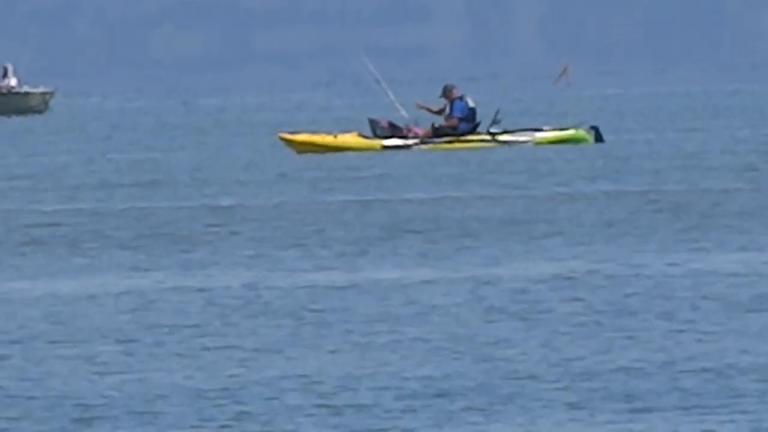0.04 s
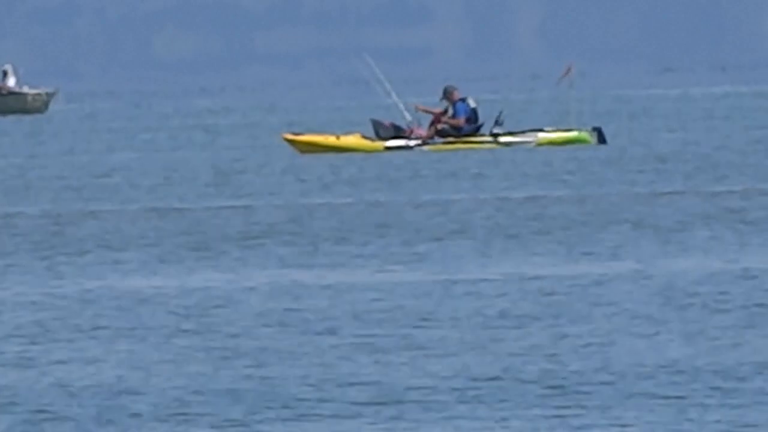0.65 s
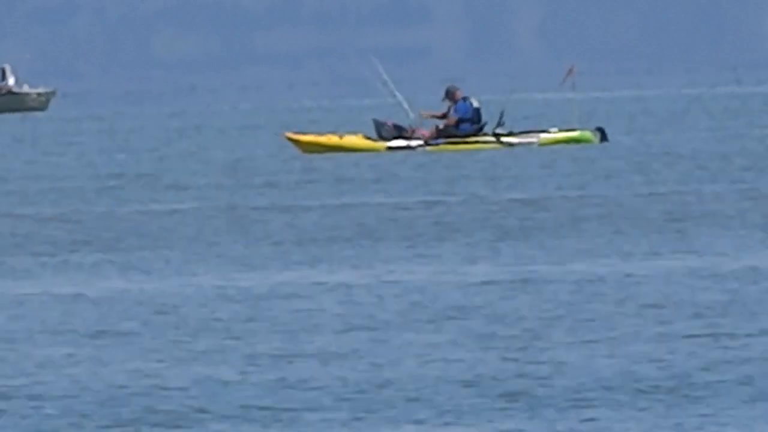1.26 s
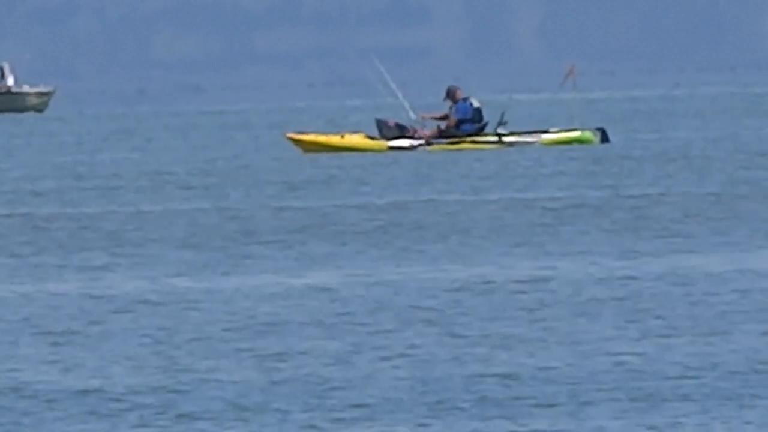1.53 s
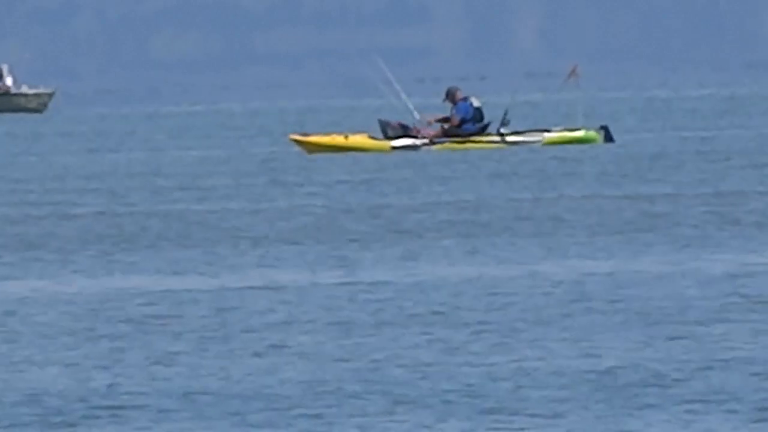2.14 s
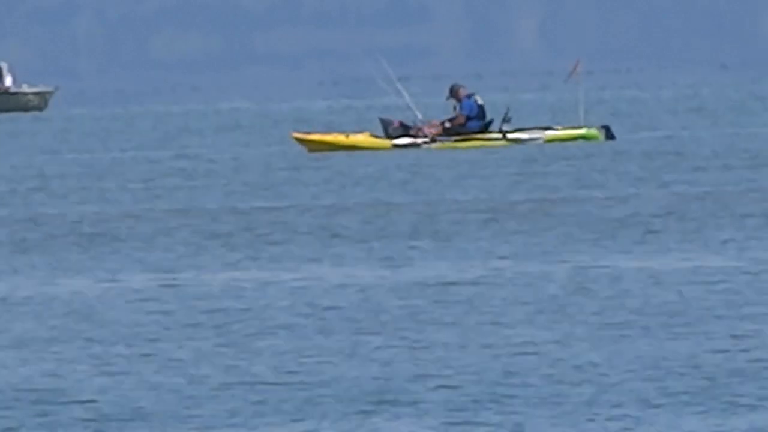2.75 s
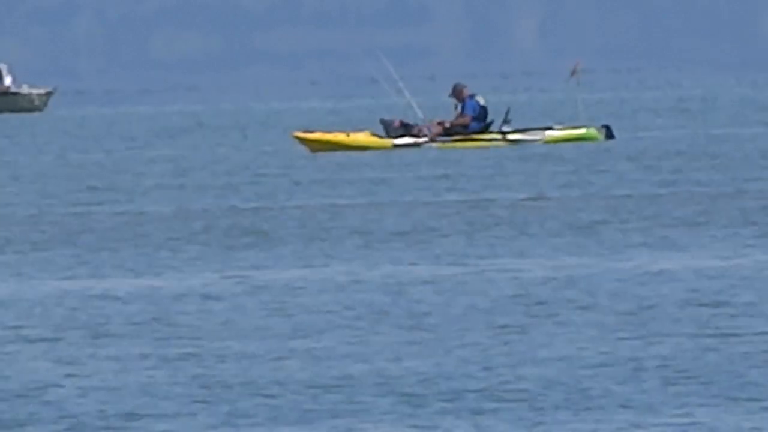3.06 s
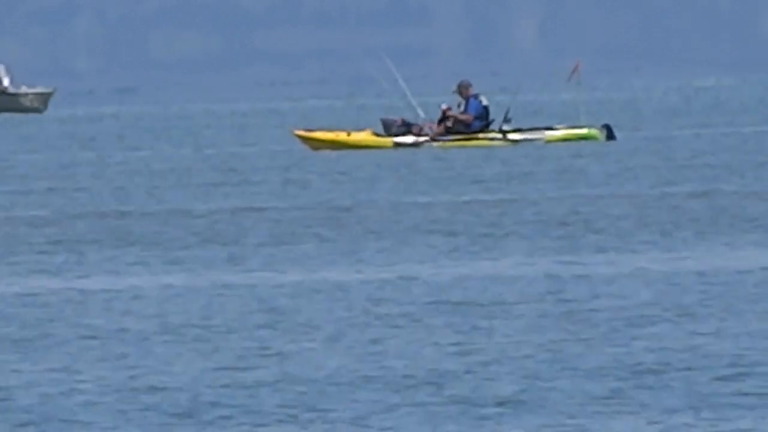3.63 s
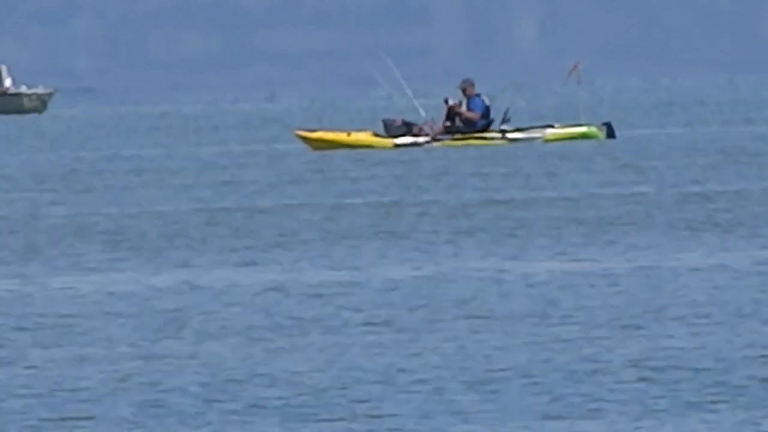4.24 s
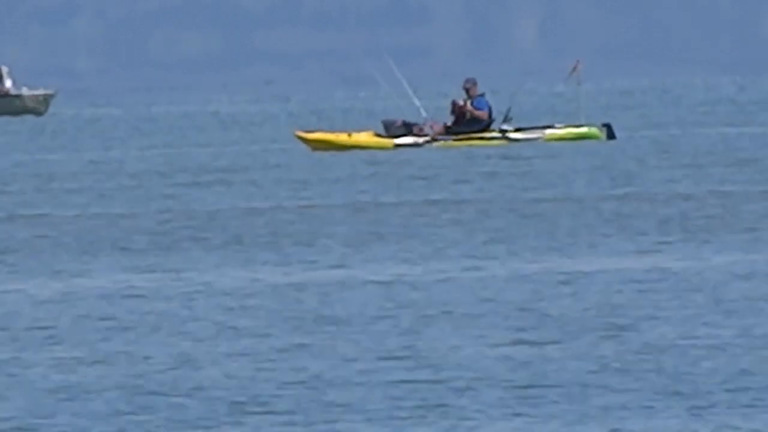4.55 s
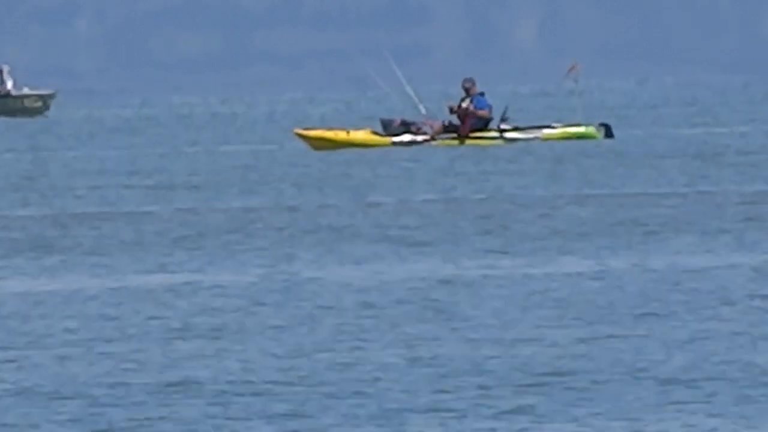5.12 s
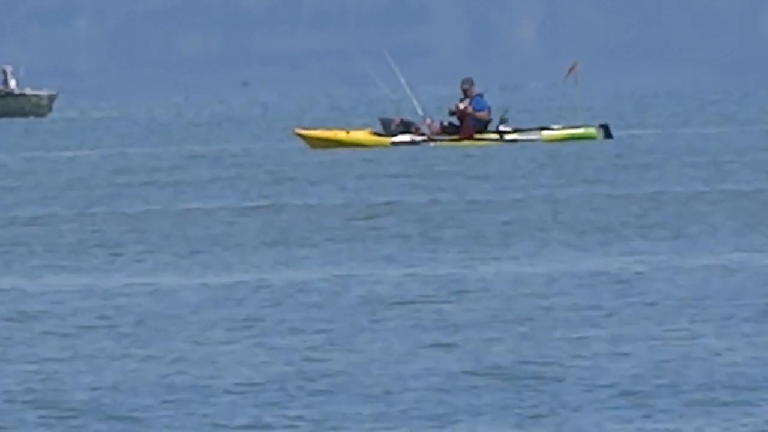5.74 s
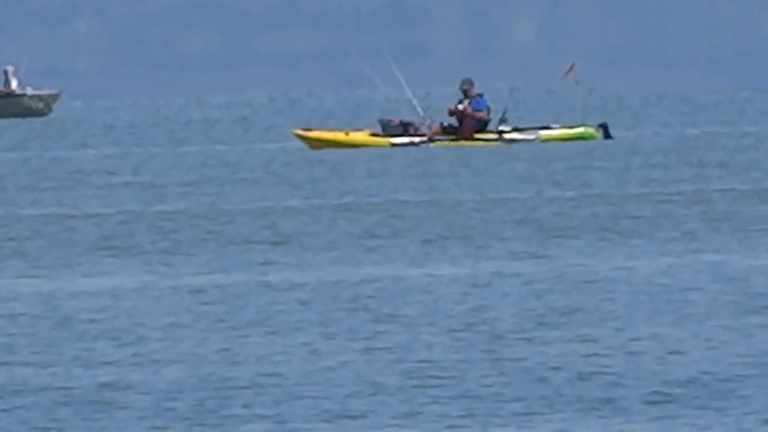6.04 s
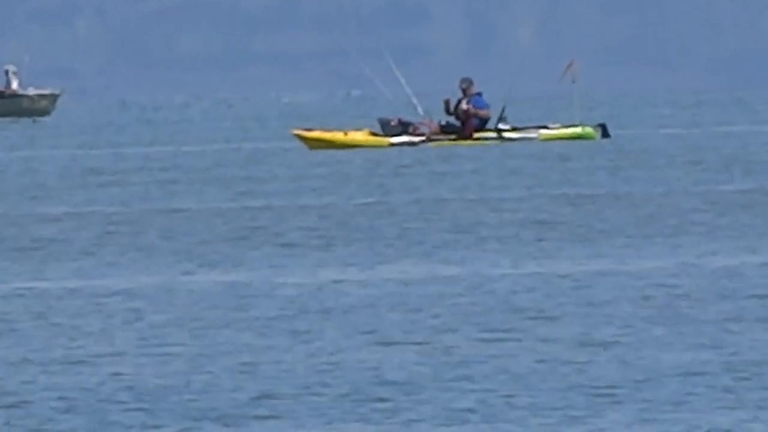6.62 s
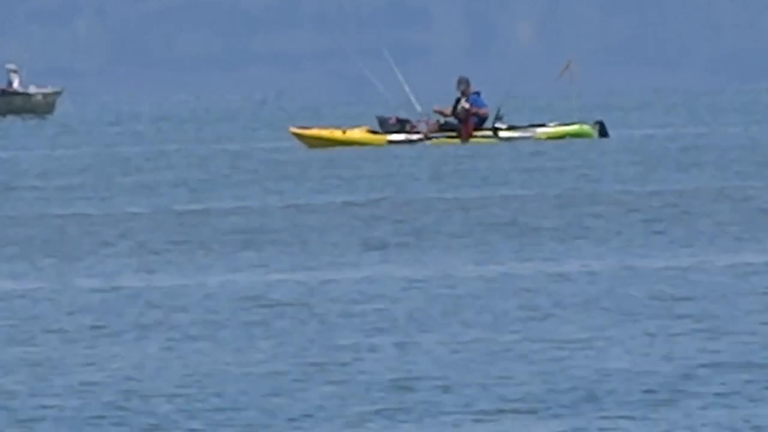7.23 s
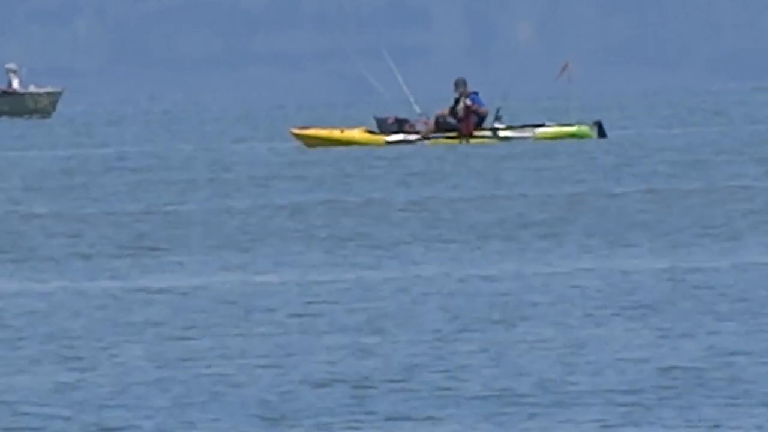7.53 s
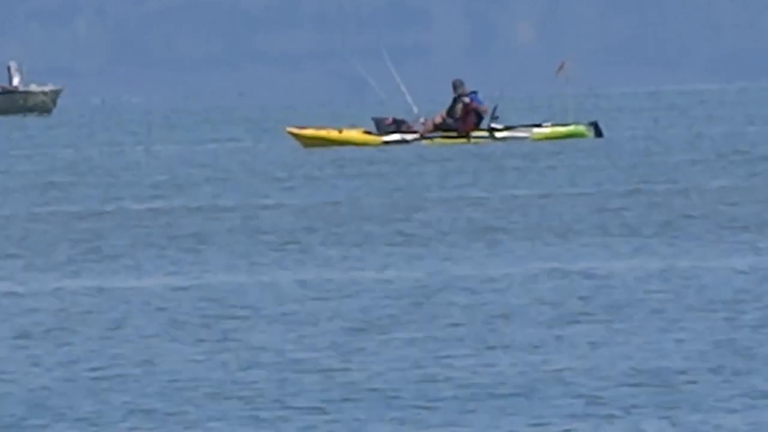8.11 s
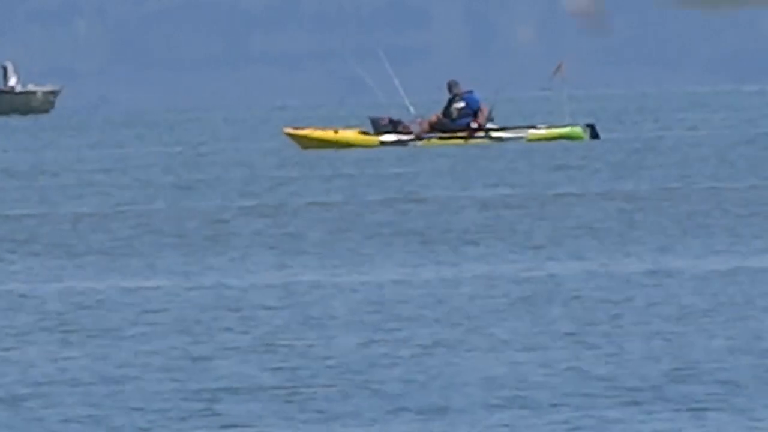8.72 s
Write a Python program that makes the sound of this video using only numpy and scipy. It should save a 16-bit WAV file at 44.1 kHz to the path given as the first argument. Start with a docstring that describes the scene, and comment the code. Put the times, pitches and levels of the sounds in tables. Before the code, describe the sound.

A busy shoreside bird colony rasps, squeals and whistles over softly plopping water and low wind gusts that grow toward the end.

```python
"""A lake shore with a chattering colony of birds, probably terns. One on the right repeats a chirp and a
falling rasp, a harmonic stack chopped into pulses by its syrinx. Others on the left answer with rasps,
chirps, thin whistles and squeals, and the flock farther off joins in bouts. Wavelets lap and plop as
trapped air rings, and a rising wind buffets the microphone in gusts."""
import sys
import numpy as np
from scipy import signal
from scipy.fft import rfft, irfft, next_fast_len
from scipy.io import wavfile
from scipy.ndimage import map_coordinates

SR = 44100
rng = np.random.default_rng(int(sys.argv[2]) if len(sys.argv) > 2 else 0)


def to_wav(s):
    """Save 16-bit WAV."""
    ch = np.atleast_2d(s).T  # columns
    pcm = np.round(np.clip(ch, -1, 1) * 32767)  # PCM
    wavfile.write(sys.argv[1], SR, pcm.astype(np.int16))


N = 391166
PULSE_HZ = 39.4  # syrinx pulse rate in rasps and chirps


def amp(db):
    """Decibels to gain."""
    return 10 ** (np.asarray(db) / 20)


def unit(x):
    """Scale to rms 1."""
    return x / np.sqrt(np.mean(x ** 2) + 1e-20)


def along(points, hz):
    """Read (f/Hz, value) points on a log frequency axis."""
    f, v = np.transpose(points)
    return np.interp(np.log(hz + 1), np.log(f + 1), v)


def curve(rows):
    """An envelope, one value per sample, from (t/s, value) rows."""
    return np.interp(np.arange(N) / SR, *np.transpose(rows))


def wobble(rate, size):
    """Smooth random modulation, rate knots a second."""
    return map_coordinates(rng.standard_normal(int(size * rate / SR) + 4), [np.arange(size) * rate / SR])


def filtered(x, response):
    """Zero-phase EQ; response gives the gain at each frequency."""
    m = next_fast_len(N + SR // 2)
    return irfft(rfft(x, m) * response(np.fft.rfftfreq(m, 1 / SR)), m)[..., :N]


def noise(spectrum, side_db):
    """Coloured stereo noise of rms 1; side_db sets the width."""
    mid, side = filtered(rng.standard_normal((2, N)), lambda hz: amp(along(spectrum, hz)))
    return unit(np.array([mid + amp(side_db) * side, mid - amp(side_db) * side]))


def add(out, s, sound, pan_db):
    """Mix a sound in at time s; pan_db is left minus right."""
    start = int(np.clip(round(s * SR), 0, N - 1))
    part = sound[:N - start]
    out[:, start:start + len(part)] += amp([[pan_db / 2], [-pan_db / 2]]) * part


def fade(t, rise, fall):
    """Straight ramps at both ends of a note."""
    return np.clip(t / rise, 0, 1) * np.clip((t[-1] - t) / fall, 0, 1)


def air():
    """A faint, steady bed of open-air hiss."""
    # hiss spectrum: f/Hz, level/dB
    spectrum = [(25, -38), (110, -17), (300, -11), (1000, 4), (3000, 10.5), (8000, 7.5), (15000, 1)]
    return amp(-59.5) * noise(spectrum, side_db=-16)


def shore_echo(x):
    """The shore returns a short diffuse tail, different at each ear."""
    # reverb time: f/Hz, t60/s
    decay = [(300, 0.45), (3000, 0.53), (10000, 0.18)]
    hz, t, spectra = signal.stft(rng.standard_normal((2, SR // 2)), SR, nperseg=256)
    tail = signal.istft(spectra * amp(-60 * t / along(decay, hz)[:, None]), SR, nperseg=256)[1]
    return signal.fftconvolve(x, tail / np.linalg.norm(tail[0]), axes=1)[:, :N]


def wind():
    """Eddies strike the microphone in lumps: a rising breeze, with deeper gusts on top."""
    # buffeting spectrum: f/Hz, level/dB
    buffet = [(20, -17), (45, -0.5), (75, 1.5), (115, 1), (200, -7.5), (350, -20.5), (900, -40),
              (3000, -92)]
    # breeze envelope: t/s, level/dB
    breeze_levels = [(0, -54), (3, -56), (5.4, -54.5), (6.5, -47), (7.9, -39), (8.2, -32.5), (8.87, -38.5)]
    # gusts that hit fast, hold and die away: t/s, hold/s, level/dB
    gusts = [(0.673, 0.023, -34.5), (0.824, 0.11, -45.5), (0.976, 0.025, -35), (2.133, 0.17, -44.5),
             (4.28, 0.047, -46), (5.493, 0.12, -37), (6.755, 0.14, -40), (7.295, 0.061, -33.5),
             (8.053, 0.16, -32.5), (8.35, 0.11, -24.5), (8.714, 0.17, -31)]
    attack_s, release_s, cutoff_hz = .011, .048, 158
    t = np.arange(N) / SR
    gust = lambda age, hold: np.clip(age / attack_s, 0, 1) * np.exp(-np.maximum(age - hold, 0) / release_s)
    breeze = unit(noise(buffet, side_db=-17) * amp(3.2 * wobble(28, N)))
    eddies = noise(buffet, side_db=-12.5) * amp(3.9 * wobble(28, N))
    thumps = unit(filtered(eddies, lambda hz: 1 / np.hypot(1, (hz / cutoff_hz) ** 2)))
    gusting = sum(amp(db) * gust(t - s, hold) for s, hold, db in gusts)
    return amp(curve(breeze_levels)) * breeze + gusting * thumps


def bubble(hz, cycles, rise):
    """An air pocket rings for some cycles, its pitch rising as it nears the surface."""
    age = np.arange(int(cycles / hz * SR)) / (cycles / hz * SR)
    ring = np.sin(2 * np.pi * cycles * (age + rise * age ** 2 / 2))
    return ring * amp(-40 * age) * (1 - np.exp(-age / .045))


def water(count):
    """A low wash fizzing with count small bubbles, and big plops that each trail weaker ones."""
    # wash envelope: t/s, level/dB
    wash_levels = [(0, -55), (1, -59), (2.8, -57), (3.4, -54), (4.1, -58), (5.2, -54.5), (6.5, -47),
                   (7.4, -46), (8.87, -52)]
    # wash spectrum: f/Hz, level/dB
    spectrum = [(60, -78), (200, 9.5), (450, 1), (800, 4.5), (1500, 3.5), (3000, -9.5), (8000, -26),
                (15000, -66)]
    # air pockets closed by wavelets: t/s, level/dB, f/Hz
    pockets = [(1.66, -41, 462), (1.723, -39, 603), (3.718, -34, 526), (5.453, -32.5, 660),
               (5.559, -35, 613), (5.663, -34.5, 310), (5.878, -32.5, 302), (6.022, -26, 388),
               (6.05, -32, 324), (6.109, -33, 330), (6.149, -34, 400), (6.234, -31.5, 476),
               (6.585, -30.5, 740), (7.058, -28, 618), (8.255, -30.5, 694), (8.764, -27.5, 583)]
    trail_s, trail_loss_db, scatter, fizz_db = .027, 7.5, .215, -3
    fizz, plops = np.zeros((2, N)), np.zeros((2, N))
    for s, (pitch, size, pan) in zip(rng.uniform(0, N / SR, count), rng.uniform(-.996, 1, (count, 3))):
        add(fizz, s, amp(8 * size) * bubble(900 * np.exp(pitch), cycles=16, rise=.2), 4 * pan)
    for s, db, hz in pockets:
        for k, (late, detune) in enumerate(rng.uniform(-1.002, 1, size=(3, 2))):
            ring = bubble(hz * np.exp(k * scatter * detune), cycles=23, rise=.078)
            add(plops, s + k * trail_s * (1 + late / 2), amp(db - k * trail_loss_db) * ring, pan_db=0)
    wash = noise(spectrum, side_db=-10) * amp(3.94 * wobble(14, N))
    wash_db = curve(wash_levels)
    bubbly = amp((wash_db - wash_db.max()) / 2)  # stronger wavelets trap more air
    return plops + amp(wash_db) * (unit(wash) + amp(fizz_db) * bubbly * unit(fizz))


def pulsing(cycle, duty, edge):
    """The syrinx snaps open once a cycle and closes more gently, each time with a new strength."""
    place, pulse = cycle % 1, cycle.astype(int)
    strength = amp(rng.standard_normal(64))[pulse % 64]
    return strength * np.clip(np.minimum(place / edge, (duty - place) / (3 * edge)), 0, 1)


def rasp(length, pitch_hz, treble_db, jitter, hiss_db):
    """A breathy harmonic stack chopped into pulses, sinking and fraying through the call."""
    # throat resonances: f/Hz, gain/dB
    throat = [(600, -5.5), (950, 3.5), (1400, 5.5), (1950, 9), (2400, 13.5), (2900, 4.5), (3700, 3),
              (4900, -0.5), (5900, -6), (7200, -15), (11000, -16.5), (12000, -18), (15000, -98)]
    sag_per_s, slide_peak_db, slide_width_hz = 1.1, 9, 1600
    t = np.arange(int(length * SR)) / SR
    progress = t / length
    fray = .3 + 1.4 * progress
    drift = .07 * wobble(30, len(t))
    cycle = np.abs(t * PULSE_HZ + drift - drift[0])
    place, pulse = cycle % 1, cycle.astype(int) % 16
    # each pulse takes its own pitch, droops, then flicks up as it closes
    step = .02 * rng.standard_normal(16)[pulse]
    droop = .035 * (place - .5)
    flick = .1 * np.clip((place - .62) / .26, 0, 1) ** 2
    contour = 1 - sag_per_s * t + step - droop + flick + .006 * wobble(120, len(t))
    pitch = pitch_hz * contour * (1 + jitter * fray * wobble(1300, len(t)))
    order = np.arange(1, 15)[:, None]
    hz = order * pitch
    shelf = lambda f: np.clip(np.log2(f / 3200) / 1.54, 0, 1)
    throat_db = lambda f: along(throat, f) + treble_db * shelf(f)
    # strong low harmonics weaken as the bill opens
    opening_db = 9 * (.5 - progress) * np.clip((4000 - hz) / 1800, 0, 1)
    pulse_colour_db = 2.6 * rng.standard_normal((len(order), 16))[:, pulse]
    # one throat resonance sweeps down through the call
    slide_hz = np.linspace(7320, 4580, len(t))
    slide_db = slide_peak_db * np.exp(-((hz - slide_hz) / slide_width_hz) ** 2)
    gains = amp(throat_db(hz) + opening_db + pulse_colour_db + slide_db)
    # unsteady vibration roughens the upper harmonics most
    flutter = np.array([wobble(700, len(t)) for _ in order]) * (.12 + .6 * shelf(hz)) * np.sqrt(fray)
    stack = (gains * (1 + flutter) * np.sin(2 * np.pi * order * np.cumsum(pitch) / SR)).sum(axis=0)
    # turbulent air passes through the same throat
    breath_colour = amp(throat_db(np.fft.rfftfreq(2 ** 14, 1 / SR) + 1))
    breath = unit(irfft(rfft(rng.standard_normal(2 ** 14)) * breath_colour))[:len(t)]
    voice = stack + amp(hiss_db) * np.std(stack) * fray * breath
    envelope = fade(t, rise=.001, fall=.05) * amp(-3 * (progress - .5))
    return voice / np.sqrt(np.mean(gains[1:3] ** 2)) * pulsing(cycle, duty=.88, edge=.065) * envelope


def far_birds(count):
    """Many overlapping rasps from farther along the shore, swelling in bouts."""
    # bout peaks: t/s, level/dB
    bouts = [(0.15, -43.5), (0.72, -48), (1.56, -42.5), (2.3, -55), (2.75, -38.5), (3.5, -46.5), (3.9, -56),
             (4.27, -46), (4.86, -41.5), (5.42, -49.5), (5.9, -67), (6.6, -74), (7.27, -51.5), (8.6, -41.5),
             (8.86, -45.5)]
    # chatter between the bouts: t/s, level/dB
    chatter = [(0, -38), (.6, -51), (1, -64), (1.3, -54), (2.1, -51), (2.5, -58.5), (3, -49), (4.5, -52.5),
               (5.8, -48), (6.1, -68), (6.5, -45.5), (8.87, -50.5)]
    colour = [(2000, 0), (3000, 10.5), (5800, 7.5), (8000, 6.5)]  # flock EQ: f/Hz, gain/dB
    rise_s, fall_s = .11, .091
    out, t = np.zeros((2, N)), np.arange(N) / SR
    for i, (when, size, pitch, level, pan) in enumerate(rng.uniform(-1, 1, (count, 5))):
        call = rasp(.19 + .04 * size, 1050 + 110 * pitch, treble_db=1, jitter=.024, hiss_db=-5)
        add(out, (i + when / 2) / count * N / SR, amp(2.5 * level) * call, pan_db=3 + 4 * pan)
    flock = unit(filtered(out, lambda hz: amp(along(colour, hz))))
    swell = lambda s: np.exp(-((t - s) / np.where(t < s, rise_s, fall_s)) ** 2)
    return (amp(curve(chatter)) + sum(amp(db) * swell(s) for s, db in bouts)) * flock


def whistle(length, notes_hz, overtones_db, depth, rate, jitter, arch):
    """A nearly pure tone gliding through its notes, throbbing with the syrinx."""
    t = np.arange(int(length * SR)) / SR
    melody = np.polyfit(np.linspace(0, 1, len(notes_hz)), notes_hz, len(notes_hz) - 1)
    cycle = t * rate + .18 * np.abs(wobble(20.9, len(t)))
    bend = arch * (.06 - (cycle % 1 - .42) ** 2)  # the pitch arches within each pulse
    pitch = np.polyval(melody, t / length) * (1 + jitter * wobble(366.3, len(t)) + bend)
    phase = 2 * np.pi * np.cumsum(pitch) / SR
    tone = np.sin(phase) + sum(amp(db) * np.sin(k * phase) for k, db in enumerate(overtones_db, 2))
    throb = 1 - depth + depth * pulsing(cycle, duty=.98, edge=.17)
    swell = amp(-7 * np.exp(-t / .0066))
    return unit(tone * throb * swell * fade(t, rise=.0031, fall=.04 * length))


def chirp(length, notes_hz):
    """A short, slightly hoarse note with a clear octave."""
    return whistle(length, notes_hz, overtones_db=[-15], depth=.75, rate=PULSE_HZ, jitter=.017, arch=.2)


def begging():
    """Wavering whistles and strained, fast-trilling squeals, from the left."""
    # whistles of nearly level pitch: t/s, length/s, first f/Hz, middle f/Hz, last f/Hz, level/dB
    whistles = [(0.15, 0.2, 3520, 3550, 3480, -43.5), (0.65, 0.17, 3410, 3490, 3430, -39),
                (1.028, .22, 3425, 3580, 3420, -41.5), (1.249, 0.15, 3410, 3455, 3430, -46.5),
                (1.839, 0.16, 3400, 3478, 3334, -41), (2.222, .19, 3410, 3544, 3390, -44),
                (3.026, 0.17, 3440, 3440, 3370, -45.5), (3.424, .17, 3440, 3420, 3470, -42),
                (4.285, 0.15, 3500, 3620, 3410, -42.5), (4.667, 0.19, 3470, 3580, 3410, -40),
                (5.084, 0.24, 3534, 3580, 3450, -43.5), (5.474, .16, 3530, 3520, 3380, -45),
                (5.92, .16, 3370, 3400, 3464, -44.5), (7.206, 0.17, 3550, 3650, 3660, -48.5),
                (7.918, 0.2, 3600, 3584, 3450, -42), (8.364, 0.17, 3480, 3640, 3540, -44.5),
                (8.838, 0.089, 3450, 3530, 3570, -39)]
    # hoarse falling squeals: t/s, length/s, first f/Hz, middle f/Hz, last f/Hz, level/dB
    squeals = [(0, .085, 3590, 3450, 3260, -37), (1.415, 0.27, 3700, 3474, 3440, -44.5),
               (4.09, 0.14, 3740, 3390, 3340, -43), (5.277, .17, 3620, 3420, 3240, -46),
               (6.308, 0.21, 3620, 3320, 3250, -43), (7.482, 0.13, 3760, 3485, 3410, -44.5),
               (8.746, 0.066, 3780, 3600, 3330, -43)]
    waver = lambda tone: unit(tone * amp(1.5 * wobble(30, len(tone)) + 1.1 * wobble(400, len(tone))))
    out = np.zeros((2, N))
    for s, length, *notes_hz, db in whistles:
        trill_hz = 48 + 2 * rng.standard_normal()
        tone = whistle(length, notes_hz, [-24, -30], depth=.85, rate=trill_hz, jitter=.01, arch=.05)
        add(out, s, amp(db) * waver(tone), pan_db=7)
    for s, length, *notes_hz, db in squeals:
        tone = whistle(length, notes_hz, [-20, -19.5], depth=.85, rate=76, jitter=.016, arch=.36)
        add(out, s, amp(db) * waver(tone), pan_db=10.5)
    return out


def answers():
    """Throatier birds on the left rasp and chirp back."""
    # answering rasps: t/s, length/s, pitch f/Hz, level/dB, treble/dB
    rasps = [(0.039, 0.25, 1072, -47, 8), (0.492, 0.206, 996, -44.5, 8.5), (0.651, 0.21, 1063, -48.5, 3.5),
             (1.395, 0.16, 1030, -48, 0), (2.318, 0.14, 1080, -44.5, -6), (2.59, 0.13, 1055, -71.5, 32.5),
             (3.309, 0.1, 1000, -47, 9.5), (3.526, 0.11, 1010, -49, 10), (3.712, 0.24, 985, -50, -23),
             (3.94, .11, 1060, -46.5, 0), (4.526, 0.19, 1035, -57, 14), (4.655, 0.13, 998, -49, -14),
             (4.799, 0.24, 1085, -43, 1), (5.291, 0.099, 970, -50.5, 9), (5.414, 0.11, 1060, -48, 5),
             (5.611, 0.18, 1090, -44.5, 7), (5.872, 0.18, 1125, -46.5, -2), (6.236, 0.3, 1065, -52.5, -9),
             (6.933, 0.15, 1055, -40.5, 4.5), (7.46, 0.093, 991, -52, 17.5), (7.664, 0.29, 1103, -46, 2),
             (8.197, 0.13, 1087, -50.5, -7), (8.385, 0.068, 971, -49, 13.5)]
    # high chirps, mostly falling: t/s, length/s, first f/Hz, last f/Hz, level/dB
    chirps = [(0.888, 0.011, 5200, 4750, -47), (1.346, 0.029, 3900, 4020, -42.5),
              (1.383, 0.03, 4800, 4820, -39), (1.588, .042, 4810, 4300, -45),
              (1.714, 0.15, 4390, 4250, -53.5), (2.568, 0.028, 4950, 4800, -56),
              (3.24, 0.085, 5020, 4300, -47.5), (3.491, 0.043, 4850, 4350, -44),
              (5.26, .04, 4940, 4320, -46), (5.388, .035, 4800, 4500, -53), (7.38, 0.078, 5020, 4480, -49),
              (8.305, 0.087, 5000, 4370, -46)]
    # throaty voice EQ: f/Hz, gain/dB
    colour = [(800, 4.5), (1050, 0.5), (2000, .5), (3000, 0.5), (4000, -4), (5500, 4), (8000, -4.5),
              (10500, 0), (12000, 1)]
    out = np.zeros((2, N))
    for s, length, pitch_hz, db, treble_db in rasps:
        call = rasp(length, pitch_hz, treble_db, jitter=.015, hiss_db=-9)
        add(out, s, amp(db) * call, pan_db=3)
    for s, length, *notes_hz, db in chirps:
        add(out, s, amp(db) * chirp(length, notes_hz), pan_db=5.5)
    return filtered(out, lambda hz: amp(along(colour, hz)))


def opening_chirp():
    """One falling pulse of a higher voice, whose third harmonic stands out."""
    # pitch glide: first f/Hz, last f/Hz
    glide = [1680, 1490]
    # harmonics from the second up: level/dB
    harmonics = [-8, 4.5, -7, -21, -9.5, -12]
    t = np.arange(int(.0203 * SR)) / SR
    pitch = np.linspace(*glide, len(t)) * (1 + .008 * wobble(600, len(t)))
    phase = 2 * np.pi * np.cumsum(pitch) / SR
    tone = sum(amp(db + 2 * rng.standard_normal()) * np.sin(k * phase) for k, db in enumerate(harmonics, 2))
    return unit(tone * fade(t, rise=.0048, fall=.0025))


def leader():
    """The bird on the right: often a yip, always a short chirp, then at once a harsh rasp."""
    # rasps about every .75 s: t/s, length/s, pitch f/Hz, level/dB, treble/dB
    rasps = [(0.297, 0.14, 1012, -46.5, -8), (1.105, 0.16, 1012, -51.5, 6), (1.976, 0.15, 1023, -48.5, 0.5),
             (2.678, 0.16, 1036, -51.5, 10), (3.393, 0.12, 1092, -47, 9), (4.175, .15, 1050, -45.5, 5.5),
             (4.913, .17, 1042, -44.5, 8), (5.655, 0.15, 1037, -42.5, 8.5), (6.415, 0.15, 1010, -41, 12.5),
             (7.067, 0.17, 1034, -40.5, 12), (7.806, 0.18, 1040, -41.5, 13.5),
             (8.551, .17, 1002, -40.5, 11)]
    # rising yips just ahead of some rasps: t/s, level/dB
    yips = [(1.06, -55.5), (1.948, -49.5), (3.358, -46.5), (4.126, -47.5), (5.555, -52), (6.37, -45.5),
            (6.915, -38), (8.515, -53)]
    # the bird's position: t/s, left minus right/dB
    position = [(0.3, -3), (2, -8), (4.2, -7.5), (8.5, -1)]
    # piercing voice EQ: f/Hz, gain/dB
    colour = [(1000, -7.5), (2000, .5), (2900, 4.5), (4000, -3), (5000, -1), (7000, 2), (7700, 6.5),
              (9500, 0), (11000, 1), (12000, -9)]
    chirp_lead_s, chirp_db = .022, -6
    out = np.zeros((2, N))
    pan = lambda s: np.interp(s, *np.transpose(position))
    for s, length, pitch_hz, db, treble_db in rasps:
        call = rasp(length, pitch_hz, treble_db, jitter=.013, hiss_db=-9)
        add(out, s - chirp_lead_s, amp(db + treble_db + chirp_db) * opening_chirp(), pan(s))
        add(out, s, amp(db) * call, pan(s))
    for s, db in yips:
        add(out, s, amp(db) * chirp(length=.0165, notes_hz=[2170, 2505]), pan(s))
    return filtered(out, lambda hz: amp(along(colour, hz)))


def scene():
    """Birds and water feed the shore's echo; wind and air stay dry."""
    sources = leader() + answers() + begging() + far_birds(count=135) + water(count=1100)
    return sources + shore_echo(amp(-12) * sources) + wind() + air()


def record(dry):
    """A brick-wall low-pass takes off the very top."""
    return filtered(dry, lambda hz: hz < 15650)


dry = scene()
out = record(dry)
to_wav(out)
```